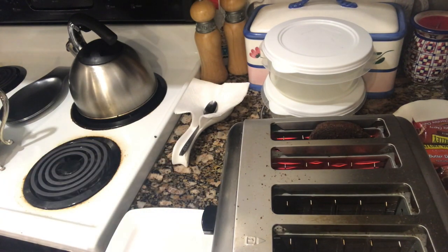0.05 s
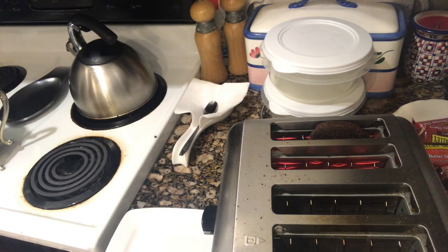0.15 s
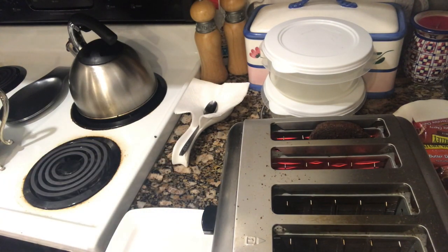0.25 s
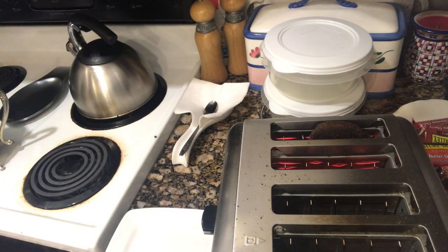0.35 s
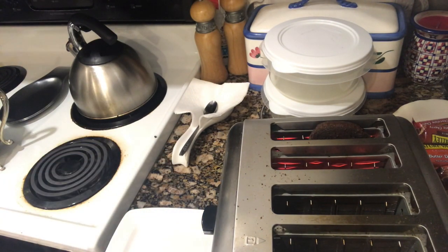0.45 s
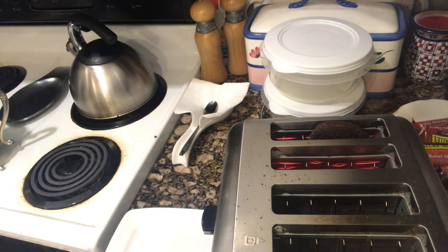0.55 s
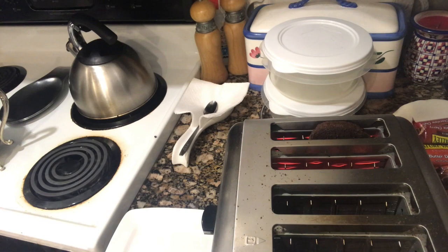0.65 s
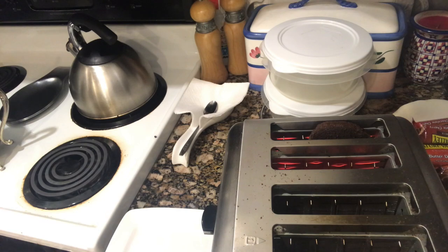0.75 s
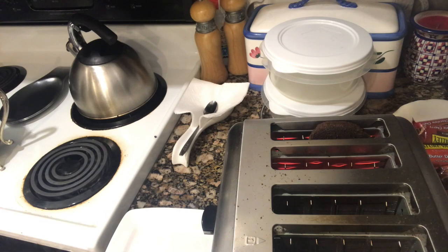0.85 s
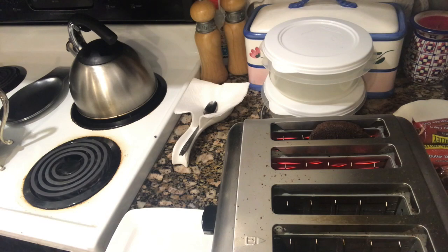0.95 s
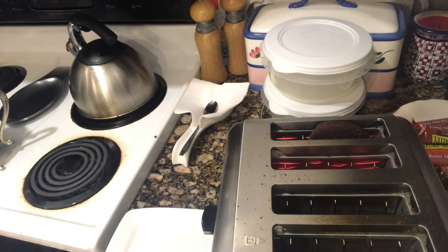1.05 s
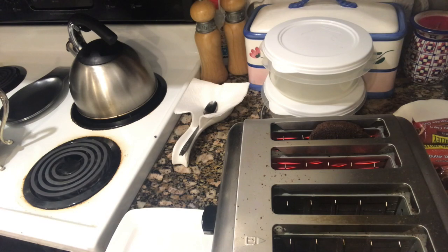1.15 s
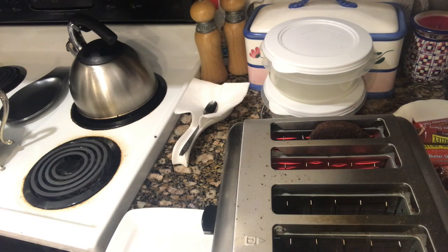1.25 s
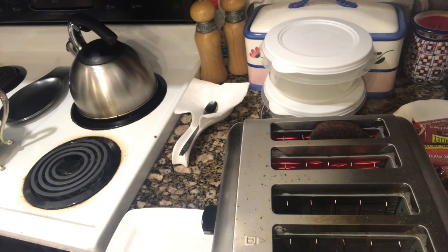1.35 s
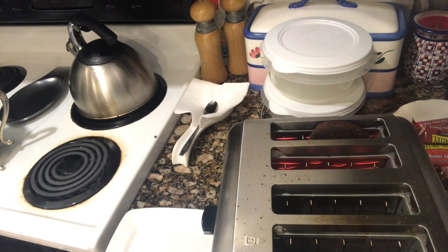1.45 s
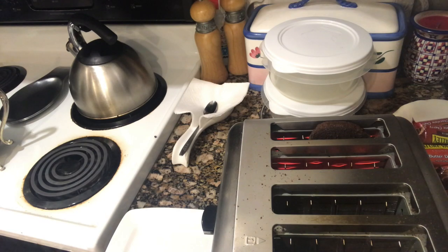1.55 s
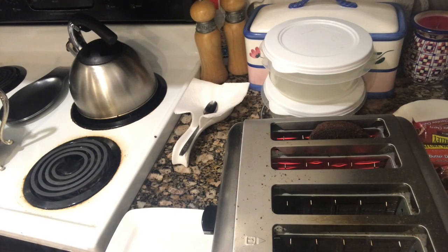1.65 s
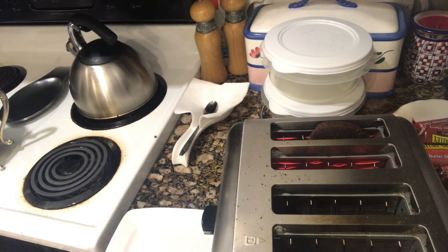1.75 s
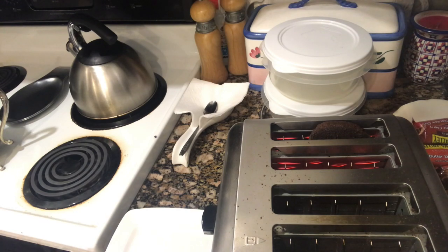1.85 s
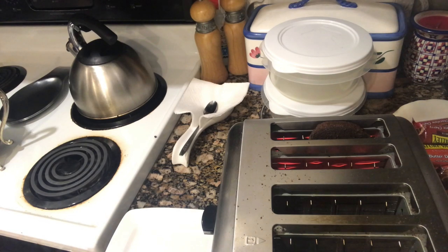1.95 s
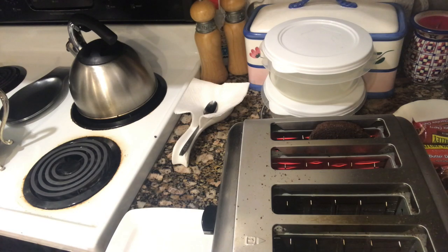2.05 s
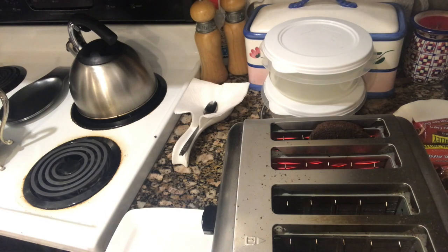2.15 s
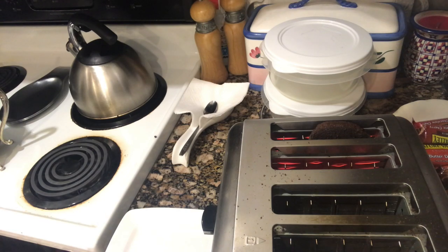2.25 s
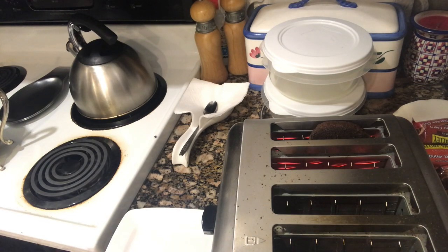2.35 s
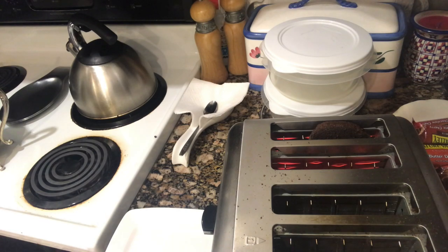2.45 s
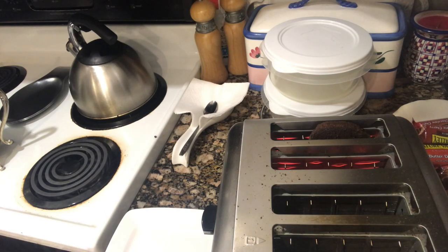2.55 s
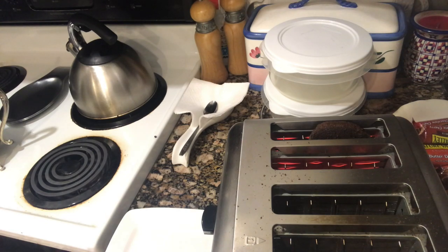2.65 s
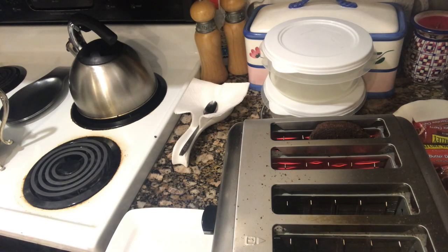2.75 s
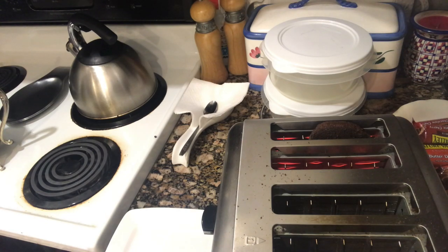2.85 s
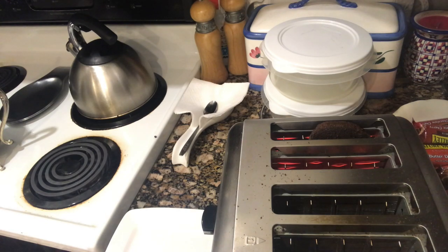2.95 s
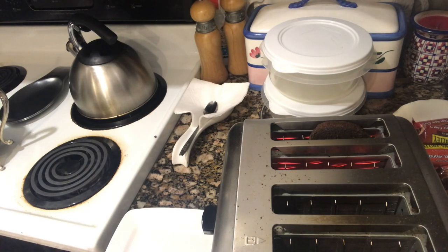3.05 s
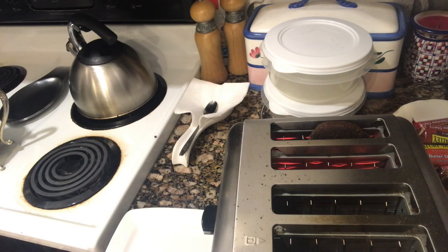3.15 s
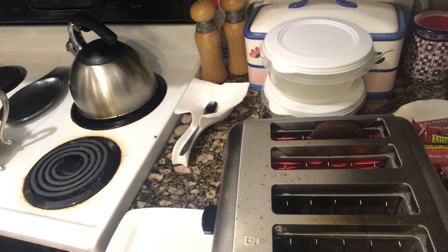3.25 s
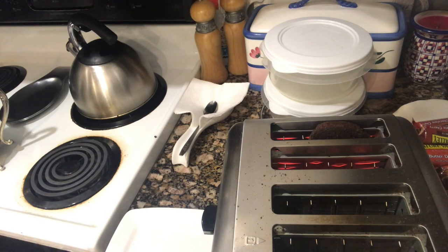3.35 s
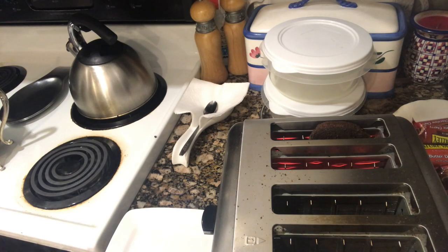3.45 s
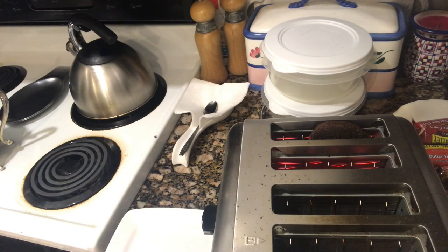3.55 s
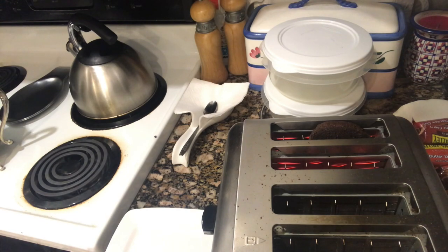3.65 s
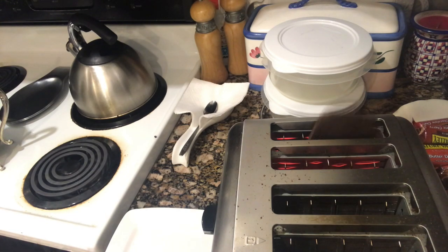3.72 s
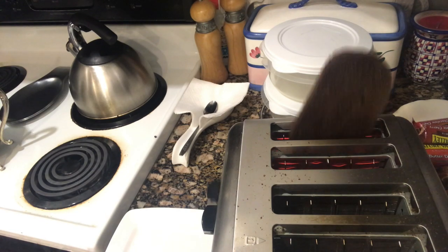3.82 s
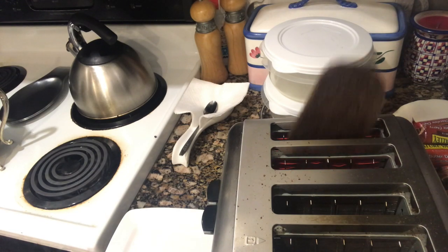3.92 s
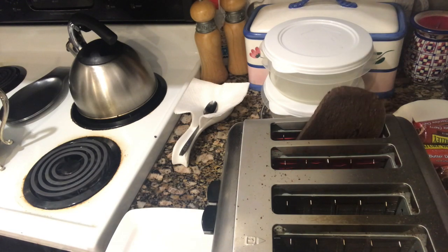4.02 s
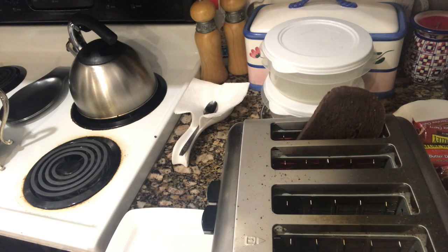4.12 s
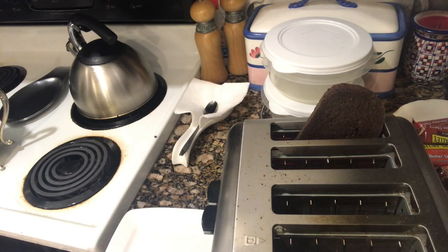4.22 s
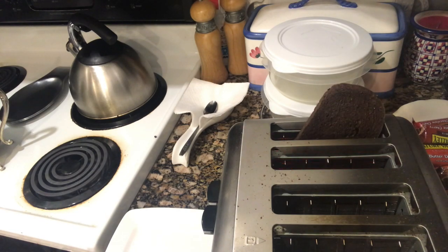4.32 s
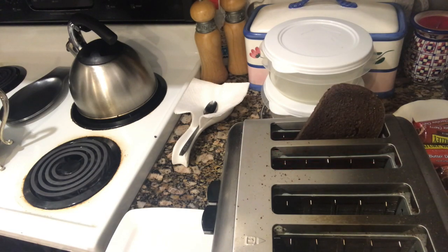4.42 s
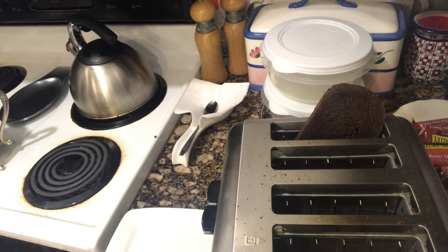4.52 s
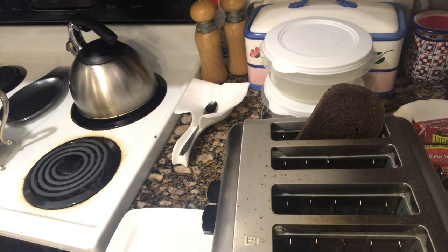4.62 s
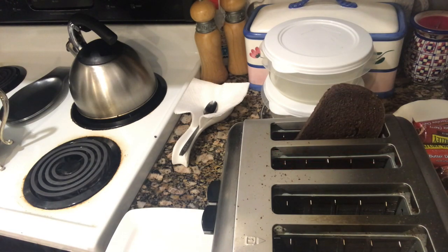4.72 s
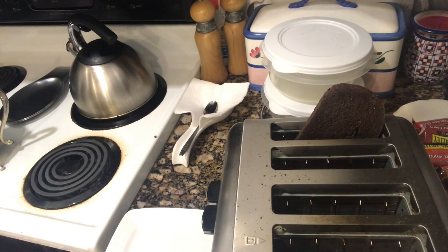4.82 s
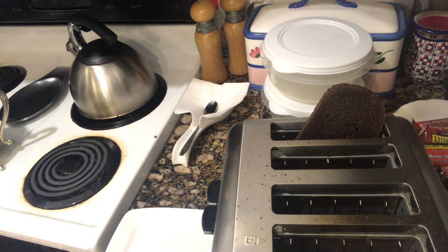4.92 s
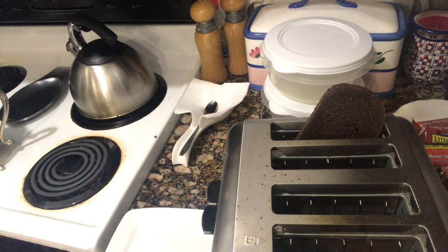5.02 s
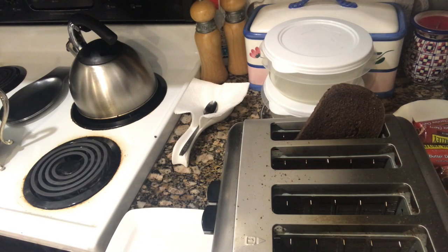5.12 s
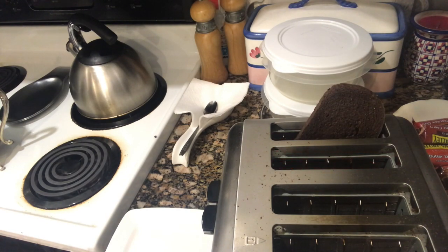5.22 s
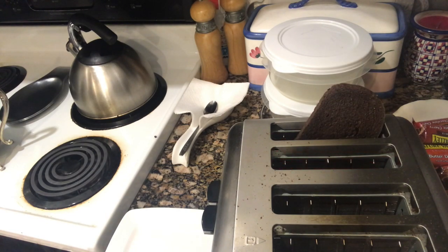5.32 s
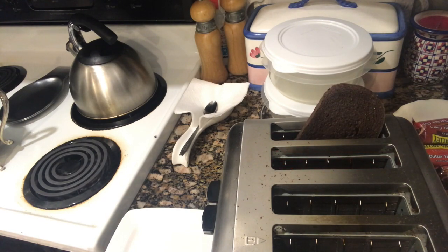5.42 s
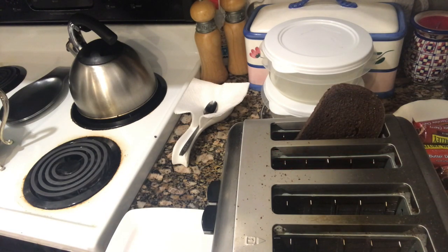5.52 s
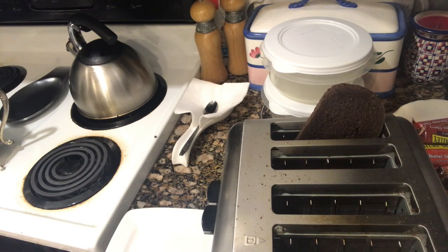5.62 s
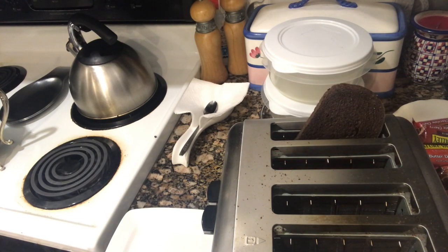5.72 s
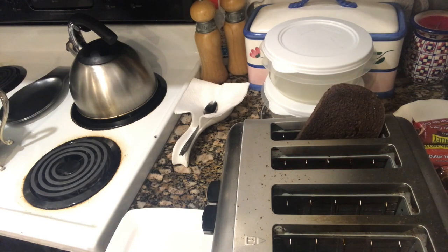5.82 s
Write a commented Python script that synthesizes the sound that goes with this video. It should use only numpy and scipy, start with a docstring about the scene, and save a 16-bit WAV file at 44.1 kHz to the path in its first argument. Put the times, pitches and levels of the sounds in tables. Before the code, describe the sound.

A quiet small kitchen with hard walls, heard through a hand-held microphone with faint low rumble and still room air. The first second is nearly silent: soft shuffling and tiny scrapes. At 1.1 s comes a dull hollow bump; around 1.5-1.7 s quick grainy scrapes and a thin, very high cutlery squeak; at 1.85 s a clear dish clink. A crockery clack follows at 2.5 s, a small hard click at 3.2 s, and dull wooden bumps at 3.5-3.7 s. At 3.79 s the close toaster catch trips and the sprung carriage slams up, a dense, bright steel clunk, by far the loudest event, chattering until 3.95 s with a low thump. The toast drops back with lighter rattles until 4.1 s, wire guards tick at 4.15-4.5 s, and low springs hum on, fading. Light scrapes, a hard click and dish knock at 4.8 s, and faint bumps and rustles close the scene.

```python
"""A steel toaster on a kitchen counter lets go: the catch trips, the sprung carriage slams up, chatters
against its stop and the toast drops back, leaving the springs humming. Each blow is grainy noise coloured
by the steel plus ringing modes; the hum is decaying sines. A little further off, kitchenware is knocked,
clinked and slid about, as noise bursts with modes or thin pings. The small hard room answers with a
diffuse tail; the hand-held microphone rumbles faintly."""
import sys
import numpy as np
from scipy import signal
from scipy.fft import rfft, irfft, next_fast_len
from scipy.io import wavfile
from scipy.ndimage import map_coordinates

SR = 44100
rng = np.random.default_rng(int(sys.argv[2]) if len(sys.argv) > 2 else 0)


def file_out(sig):
    """Save sig as 16-bit WAV at sys.argv[1]."""
    # one column per channel
    cols = np.atleast_2d(sig).T
    # limit, then scale
    lim = np.clip(cols, -1, 1)
    pcm = np.round(lim * 32767).astype(np.int16)
    wavfile.write(sys.argv[1], SR, pcm)


N = 259211
TIME = np.arange(N) / SR
AGE = TIME[:SR * 6 // 10]  # time since a contact began [s]
ONSET = SR // 40  # the opening 25 ms on which a contact's level is judged [samples]
STOP_S = 3.869  # the carriage hits its stop [s]


def amp(db):
    """Decibels to gain."""
    return 10 ** (np.asarray(db) / 20)


def unit(x, size=None):
    """Scale to rms 1, judged on the first size samples."""
    return x / np.sqrt(np.mean(x[:size] ** 2) + 1e-20)


def along(points, hz):
    """(Hz, value) points read on a log frequency axis."""
    f, v = np.transpose(points)
    return np.interp(np.log(hz + 1), np.log(f), v)


def fade(t, t60):
    """Exponential decay, 60 dB down after t60."""
    return np.exp(-np.log(1000) * t / t60)


def swell(s, rise, length, t60):
    """A gesture from time s: it rises, holds until length has passed, then decays."""
    return np.clip((TIME - s) / rise, 0, 1) * fade(np.maximum(TIME - s - length, 0), t60)


def add(track, s, sound):
    """Mix a sound into the track at time s."""
    room_left = track[round(s * SR):][:len(sound)]
    room_left += sound[:len(room_left)]


def noise(spectrum, size=N):
    """Coloured noise of rms 1."""
    m = next_fast_len(size)
    white = rfft(rng.standard_normal(m))
    gain = amp(along(spectrum, np.fft.rfftfreq(m, 1 / SR)))
    return unit(irfft(white * gain, m)[:size])


def wobble(rate):
    """A smooth random curve, rate knots a second."""
    knots = rng.standard_normal(int(N * rate / SR) + 4)
    return map_coordinates(knots, [TIME * rate / SR])


def rustle(flutter_db, drift_db):
    """Soft, uneven rubbing of rms 1."""
    # colour of soft rubbing: (frequency [Hz], relative level [dB])
    soft_colour = [(70, -25), (130, -9), (280, -2.5), (500, -4.5), (1100, -2), (2200, -14.5), (5500, -21),
                   (10000, -27.5), (15800, -36.5)]
    unevenness_db = flutter_db * wobble(70) + drift_db * wobble(14)
    return unit(noise(soft_colour) * amp(unevenness_db))


def grainy(grain_db):
    """White noise broken into tiny contacts of uneven strength."""
    contacts = np.repeat(rng.standard_normal(len(AGE)), 32)[:len(AGE)]  # each lasts 32 samples
    return rng.standard_normal(len(AGE)) * amp(grain_db * contacts)


def coloured(x, spectrum):
    """Pass x through a body with this spectrum: causal, so that its peaks ring on."""
    m = next_fast_len(2 * len(x))
    log_gain = np.log(amp(along(spectrum, np.fft.rfftfreq(m, 1 / SR))))
    # folding the cepstrum forward in time makes the filter minimum-phase
    cepstrum = irfft(log_gain, m)
    cepstrum[1:m // 2] *= 2
    cepstrum[m // 2 + 1:] = 0
    return irfft(rfft(x, m) * np.exp(rfft(cepstrum)), m)[:len(x)]


def tone(balance, db, colour_db):
    """Register levels of one contact: the object's own balance, leaning with how it is touched."""
    own_db, lean = np.transpose(balance)
    return db + own_db + lean * colour_db


def weigh(x, levels_db):
    """Where and how hard a contact lands sets the level of each register."""
    # thud, body, clash and fizz: (lower edge [Hz], upper edge [Hz])
    register_bands = [(100, 600), (600, 2000), (2000, 7000), (7000, 17000)]
    total = np.zeros(len(x))
    for k, (band, db) in enumerate(zip(register_bands, levels_db)):
        sos = signal.butter(3, band, 'bandpass', fs=SR, output='sos')
        part = unit(signal.sosfilt(sos, x), size=ONSET)
        total += (-1) ** k * amp(db) * part  # neighbours take opposite polarity
    return total


def ring(modes):
    """Modes rung at new strengths and phases by each blow."""
    hz, db, t60 = np.transpose(modes)[:, :, None]
    phase = rng.uniform(0, 2 * np.pi, hz.shape)
    level = amp(db + 3 * rng.standard_normal(hz.shape))
    capped = np.minimum(t60, AGE[-1])  # no mode rings longer than 0.6 s
    partials = level * fade(AGE, capped) * np.sin(2 * np.pi * hz * AGE + phase)
    return unit(np.sum(partials, axis=0), size=ONSET)


def blow(levels_db, chatter, spectrum, modes, t60, ring_db, grain_db):
    """Parts meet with a crack and chatter, then dense modes die fast and a few clear ones ring on."""
    crack = 1 + 0.42 * fade(AGE, 0.014)
    force = fade(np.maximum(AGE - chatter, 0), t60) * crack
    burst = coloured(grainy(grain_db) * force, spectrum)
    struck = unit(burst, size=ONSET) + amp(ring_db) * ring(modes)
    return weigh(struck * (1 - fade(AGE, .003)), levels_db)  # softened attack


def stroke(length, spectrum, grain_db):
    """Friction swells and eases off over one short slide."""
    pressure = np.sqrt(np.abs(np.sin(np.pi * np.minimum(AGE / length, 1))))
    return unit(coloured(grainy(grain_db) * pressure, spectrum), size=ONSET)


def boom(hz, t60, rise):
    """A single low mode that builds up and dies away."""
    return np.sin(2 * np.pi * hz * AGE) * fade(AGE, t60) * (1 - fade(AGE, rise))


def in_kitchen(x, wet_db):
    """The sound plus a diffuse tail that builds as the walls answer."""
    # decay of the small hard room: (frequency [Hz], t60 [s])
    room_decay = [(100, 0.54), (400, 0.32), (1200, 0.34), (4000, 0.3), (8000, 0.3), (15000, 0.25)]
    hz, t, z = signal.stft(rng.standard_normal(len(AGE)), SR, nperseg=256)
    decaying = z * fade(t, along(room_decay, hz)[:, None])
    tail = signal.istft(decaying, SR, nperseg=256)[1][:len(AGE)]
    tail = tail * (1 - fade(AGE, 0.026))
    answer = amp(wet_db) * tail / np.linalg.norm(tail)
    return x + signal.fftconvolve(x, answer)[:len(x)]


def room_air():
    """Still room air: steady coloured noise."""
    # colour of the quiet kitchen: (frequency [Hz], relative level [dB])
    air_colour = [(12, -26), (20, -7.5), (76, 1.5), (145, 0), (365, -9), (1110, -19), (1210, -26.5),
                  (1470, -19.5), (2880, -21.5), (3130, -18.5), (4890, -26.5), (5780, -20.5), (6840, -26),
                  (12000, -30.5), (15800, -30)]
    return amp(-70.5) * noise(air_colour)


def microphone_rumble():
    """A faint rumble from the hand-held microphone rises as the hand shifts or the toaster jolts it."""
    # rumble swells: (time [s], rumble level [dB], length [s])
    rumble_swells = [(0.102, -59.5, 0.14), (0.79, -54.5, 0.11), (1.292, -58, .12), (1.59, -61, .09),
                     (1.79, -63, 0.14), (2.043, -66.5, 0.36), (2.505, -64, 0.085), (3.216, -66.5, 0.092),
                     (3.47, -65.5, 0.046), (3.777, -55.5, .08), (4.043, -56.5, 0.078), (4.664, -57, 0.14),
                     (5.243, -58, 0.094)]
    # colour of the rumble: (frequency [Hz], relative level [dB])
    rumble_colour = [(12, -29.5), (20, -10), (43, 3.5), (75, -7), (113, -3.5), (194, -39.5), (250, -11.5),
                     (320, -33), (550, -120)]
    power = amp(-77) ** 2  # steady holding
    for s, db, length in rumble_swells:
        power = power + (amp(db) * swell(s, rise=0.059, length=length, t60=.8)) ** 2
    return np.sqrt(power) * noise(rumble_colour)


def shuffling():
    """Soft shuffling at the counter, uneven rubbing that comes and goes."""
    # the shuffling as it comes and goes: (time [s], level [dB])
    bustle = [(0, -67.5), (.55, -85.5), (1.0, -77.5), (1.7, -61.5), (2.8, -75), (3.4, -71), (4.55, -67),
              (5.1, -76.5), (5.88, -73.5)]
    bustle_db = np.interp(TIME, *np.transpose(bustle))
    return in_kitchen(amp(bustle_db) * rustle(flutter_db=3, drift_db=2.5), wet_db=-12.0)


def sliding():
    """Things dragged over the counter give short grainy scrapes."""
    # slides and rustles: (time [s], relative level [dB], brightness [dB], stroke length [s])
    strokes = [(0.729, -71.5, 10, 0.048), (0.804, -58.5, 3.5, 0.069), (0.901, -62.5, 5, .043),
               (1.002, -63, -11, 0.026), (1.344, -65, -7, 0.036), (1.526, -57.5, 11.5, 0.025),
               (1.555, -52.5, 1, 0.037), (1.645, -48.5, 2.5, 0.033), (1.691, -57.5, -8.5, 0.063),
               (2.124, -73, -12, 0.059), (2.327, -65.5, 7.5, .075), (2.73, -69, -7.5, 0.052),
               (2.931, -71.5, -3, 0.022), (3.186, -76.5, -17, 0.037), (4.47, -69.5, -1, 0.048),
               (4.553, -60, 4, 0.012), (4.597, -78.5, -12, 0.13), (5.252, -73, 2, .1),
               (5.377, -62, 1.5, 0.035), (5.443, -73.5, -1, 0.024), (5.805, -59.5, 12, 0.035)]
    # colour of a scrape: (frequency [Hz], relative level [dB])
    scrape_colour = [(88, -41), (150, -46), (249, 0.5), (375, -6), (786, -3), (2080, -9.5), (4040, -9),
                     (5000, -15.5), (8980, -13), (10300, -19), (14100, -14.5), (15800, -20)]
    # thud, body, clash, fizz: (share [dB], gain per brightness [dB/dB])
    scrape_balance = [(-5.5, -0.42), (1, -0.52), (-1, 0.58), (-12.5, 0.42)]
    out = np.zeros(N)
    for s, db, bright_db, length in strokes:
        levels_db = tone(scrape_balance, db, bright_db)
        scrape = weigh(stroke(length, scrape_colour, grain_db=1.0), levels_db)
        add(out, s, amp(-3.5) * in_kitchen(scrape, wet_db=-0.5))
    return out


def cutlery_squeaks():
    """Thin steel dragged over a hard surface squeaks very high: friction noise and faint ringing."""
    # squeaks: (time [s], level [dB], stroke length [s])
    squeaks = [(1.644, -38.5, 0.033), (1.694, -47.5, 0.026), (1.842, -58.5, 0.085), (2.163, -60, 0.016),
               (4.534, -62, 0.073)]
    # colour of the friction: (frequency [Hz], relative level [dB])
    squeal_colour = [(8000, -33), (10200, -11.5), (10750, 4.5), (11600, -7), (12500, -10), (14300, -5.5),
                     (15300, 4.5), (15800, 0)]
    # ringing tines: (frequency [Hz], relative level [dB], t60 before the cap [s])
    tine_modes = [(10980, -29, .3), (11030, -20, 0.097), (11360, -33, .2), (14000, -12.5, 0.83),
                  (14250, -10.5, 0.45), (15160, 3, 0.2), (15600, 8, .27), (15200, 13, .25),
                  (15500, -8, 0.48)]
    out = np.zeros(N)
    for s, db, length in squeaks:
        rub = stroke(length, squeal_colour, grain_db=1.0)
        tines = ring(tine_modes) * (1 - fade(AGE, 0.045))
        add(out, s, amp(db) * in_kitchen(rub + amp(-23.0) * tines, wet_db=-4))
    return out


def cutlery_pings():
    """Thin steel, touched, pings: a few decaying partials that waver in phase."""
    # pings: (time [s], level of each partial [dB], t60 [s], partials [Hz])
    pings = [(1.306, -63, 0.16, [3110, 4160, 5250, 6330, 15900]), (1.529, -62, 0.3, [9800, 6500, 13000]),
             (1.783, -64, .3, [11000, 12550, 13550]), (1.842, -56, .25, [13950]),
             (2.335, -64, 0.19, [5700]), (4.478, -73, 0.14, [6900, 11000]),
             (4.555, -64, .33, [1120, 4330, 4600, 14300])]
    out = np.zeros(N)
    for s, db, t60, partials_hz in pings:
        # the moving contact makes each partial waver
        steps = rng.standard_normal((len(partials_hz), len(AGE)))
        drift = .1 * np.cumsum(steps, axis=1)
        partials = np.sin(2 * np.pi * np.outer(partials_hz, AGE) + drift)
        ping = partials.sum(axis=0) * fade(AGE, t60) * (1 - fade(AGE, 0.0031))
        add(out, s, amp(db) * in_kitchen(ping, wet_db=0))
    return out


def woodwork():
    """Dull bumps on cupboard and counter: larger panels sound lower; a few low booms swell beside them."""
    # bumps: (time [s], relative level [dB], hollowness [dB], pitch ratio)
    bumps = [(.208, -68, -4, 0.98), (1.081, -47.5, 10, 0.91), (1.481, -56, 1, 0.87),
             (3.054, -64.5, -2.5, 0.64), (3.484, -55.5, 2, 0.83), (3.506, -53, 1.5, 1),
             (3.528, -56.5, -2.5, 0.3), (3.691, -62, -5.5, 0.98), (3.712, -51.5, -2.5, 0.99),
             (4.743, -61, 10.5, 0.52), (5.347, -62, 7, 0.61), (5.55, -60.5, 2, 0.73)]
    # colour of a panel at pitch ratio 1: (frequency [Hz], relative level [dB])
    wood_colour = [(71, -62.5), (120, -18.5), (181, -20), (377, -10.5), (443, -13.5), (491, -10),
                   (739, -7.5), (1510, -8.5), (2510, -25.5), (2840, -25), (5140, -29), (8920, -41),
                   (9680, -49), (15800, -48)]
    # thud, body, clash, fizz: (share [dB], gain per hollowness [dB/dB])
    wood_balance = [(2, -0.73), (-1, .55), (-3, -.5), (-15.5, -0.46)]
    # low booms: (time [s], frequency [Hz], level [dB])
    booms = [(3.056, 244.6, -44.5), (3.18, 266, -57), (3.501, 299, -52), (3.706, 304.5, -46),
             (5.55, 282, -58)]
    out = np.zeros(N)
    for s, db, hollow_db, pitch in bumps:
        panel = np.array(wood_colour) * [pitch, 1]
        thump = coloured(grainy(grain_db=5.5) * fade(AGE, 0.06), panel)
        bump = weigh(thump, tone(wood_balance, db, hollow_db))
        add(out, s, amp(-3.0) * in_kitchen(bump, wet_db=0.5))
    for s, hz, db in booms:
        add(out, s, amp(db) * boom(hz, t60=.19, rise=.09))
    return out


def trinket():
    """A small hard thing clicks on the counter and rings, with plenty of room behind."""
    # clicks: (time [s], relative level [dB], brightness [dB], contact length [s])
    clicks = [(1.386, -61, 4, 0.0082), (3.232, -46.5, 1.5, .006), (3.433, -62, 4.5, 0.0076),
              (4.834, -46, 2.5, 0.0054)]
    # colour: (frequency [Hz], relative level [dB])
    trinket_colour = [(71, -38.5), (120, -12.5), (462, -15), (627, -4.5), (709, -23.5), (1000, 0),
                      (1210, -10), (1360, -5.5), (1710, -12), (4020, -3), (4550, -10.5), (6840, -15.5),
                      (15800, -42)]
    # ringing: (frequency [Hz], relative level [dB], t60 [s])
    trinket_modes = [(2620, -11, 0.37), (3340, -2.5, 0.24), (4048, 0.5, 0.21), (6280, -8, 0.22),
                     (6800, -17, 0.42), (7610, -6, 0.22)]
    # thud, body, clash, fizz: (share [dB], gain per brightness [dB/dB])
    trinket_balance = [(-9.5, -0.3), (-8.5, 1.7), (0, 0.3), (-19.5, 3)]
    out = np.zeros(N)
    for s, db, bright_db, contact in clicks:
        levels_db = tone(trinket_balance, db, bright_db)
        click = blow(levels_db, contact, trinket_colour, trinket_modes, t60=.03, ring_db=-13, grain_db=3.0)
        add(out, s, amp(-6.5) * in_kitchen(click, wet_db=0.5))
    return out


def crockery():
    """Heavier crockery set down: a clack that rings it, with some room behind."""
    # clacks: (time [s], relative level [dB], brightness [dB], contact length [s])
    clacks = [(.99, -62.5, -3, .003), (2.036, -58, -7.5, 0.0052), (2.32, -58.5, -6.5, 0.012),
              (2.495, -41.5, 0.5, 0.01)]
    # colour: (frequency [Hz], relative level [dB])
    crock_colour = [(71, -49), (120, -20.5), (301, -13), (501, -14), (1050, 0), (1510, -11.5),
                    (1710, -13.5), (2670, -17.5), (3780, -12.5), (5140, -22), (5930, -15.5), (7130, -25),
                    (15800, -46)]
    # ringing: (frequency [Hz], relative level [dB], t60 [s])
    crock_modes = [(870, 3, 0.16), (1073, 8, 0.22), (2940, 7, 0.097), (3800, 3, 0.16), (4400, -19, 0.33),
                   (5800, -27, 0.22), (6840, -31, 0.4), (7757, -8, 0.16)]
    # thud, body, clash, fizz: (share [dB], gain per brightness [dB/dB])
    crock_balance = [(-6.5, -1.6), (1.5, -0.2), (-0.5, 0.76), (-14.5, 0.23)]
    out = np.zeros(N)
    for s, db, bright_db, contact in clacks:
        levels_db = tone(crock_balance, db, bright_db)
        clack = blow(levels_db, contact, crock_colour, crock_modes, t60=0.024, ring_db=-11.5, grain_db=3.5)
        add(out, s, amp(-4.5) * in_kitchen(clack, wet_db=-1.0))
    return out


def dish():
    """A dish is clinked: a short knock that rings it, with some room behind."""
    # knocks: (time [s], relative level [dB], brightness [dB], contact length [s], relative ring [dB])
    knocks = [(0.034, -63.5, -7.5, 0.009, -24), (1.85, -40, -2, 0.0057, -2),
              (1.86, -43.5, -10.5, 0.002, -5), (4.796, -54.5, -4.5, .003, -6)]
    # colour: (frequency [Hz], relative level [dB])
    dish_colour = [(120, -17), (420, -18), (620, -11), (1050, -3), (1450, -8), (2100, -16), (2900, -12),
                   (4000, -12), (5000, -16), (6100, -12), (7600, -21), (10000, -29), (15800, -31)]
    # ringing: (frequency [Hz], relative level [dB], t60 [s])
    dish_modes = [(923, -10, .22), (1027, 7, 0.23), (1114, 9, 0.17), (1350, -3, 0.32), (2100, -3, .14),
                  (2860, -4, .18), (3310, -10, 0.18), (3840, -20, 0.18), (5652, -22, .12),
                  (6600, -29, 0.16), (6907, -11.5, 0.23), (7580, -11, 0.17), (7833, -16, .25)]
    # thud, body, clash, fizz: (share [dB], gain per brightness [dB/dB])
    dish_balance = [(-12, -0.24), (-1, -0.5), (3.5, .7), (-4.5, 0.5)]
    out = np.zeros(N)
    for s, db, bright_db, contact, ring_db in knocks:
        levels_db = tone(dish_balance, db, bright_db)
        knock = blow(levels_db, contact, dish_colour, dish_modes, t60=0.083, ring_db=ring_db, grain_db=1.0)
        add(out, s, amp(-4.5) * in_kitchen(knock, wet_db=-4.0))
    return out


def toaster_feet():
    """The toaster's feet thump the counter: low decaying sines."""
    # thumps: (time [s], frequency [Hz], level [dB], t60 [s])
    thumps = [(3.804, 139, -40.5, 0.33), (3.868, 76.7, -47.5, 0.32), (3.867, 156, -40, 0.28)]
    out = np.zeros(N)
    for s, hz, db, t60 in thumps:
        add(out, s, amp(db) * boom(hz, t60, rise=0.028))
    return out


def toaster_springs():
    """Shaken at the stop, the frame booms briefly and the slack springs hum on as decaying sines."""
    # springs and frame: (frequency [Hz], level [dB], t60 [s])
    spring_modes = [(86.5, -56, 4.5), (126, -61, 3.5), (213.5, -54, 3), (240, -50, .9), (255, -44, .85),
                    (266, -54, 1.3), (328, -56, 1.6), (420, -39, .65), (432, -55, 1.5)]
    hum = np.zeros(N)
    for hz, db, t60 in spring_modes:
        hum += amp(db) * fade(TIME, t60) * np.sin(2 * np.pi * hz * TIME)
    out = np.zeros(N)
    add(out, STOP_S, hum * (1 - fade(TIME, .05)))
    return out


def toaster_shiver():
    """The shaken carriage and toast go on shivering after the slam: soft rubbing that dies away."""
    envelope = swell(STOP_S, rise=.012, length=0.3, t60=0.48)
    return amp(-55.5) * envelope * rustle(flutter_db=3, drift_db=1)


def toaster_guards():
    """The toast jiggles the wire guards: light blows with a short wiry ring."""
    # jiggles: (time [s], relative level [dB], brightness [dB], chatter length [s])
    jiggles = [(4.145, -48, 0, 0.0032), (4.162, -47, 1, 0.011), (4.312, -52.5, -0.5, 0.011),
               (4.347, -66, 2.5, .005), (4.426, -60.5, -5.5, 0.0037), (4.478, -62.5, -1.5, .008)]
    # colour: (frequency [Hz], relative level [dB])
    wire_colour = [(150, -10.5), (1200, -12), (1600, -3), (2200, -16), (2680, 1), (3300, -13.5),
                   (5000, -14), (5950, -9), (7000, -18), (10200, -18), (15800, -22.5)]
    # ringing: (frequency [Hz], relative level [dB], t60 [s])
    guard_modes = [(1620, -6, .08), (2620, -2, .08), (2740, -2, .09), (5780, -2, .07), (5920, -2, .08),
                   (6080, -1, .08), (8100, -9, .07), (10200, -9, .07)]
    # thud, body, clash, fizz: (share [dB], gain per brightness [dB/dB])
    wire_balance = [(-7, -0.07), (-8.5, -0.86), (0.5, 0.13), (-3, 1.4)]
    out = np.zeros(N)
    for s, db, bright_db, chatter in jiggles:
        levels_db = tone(wire_balance, db, bright_db)
        jiggle = blow(levels_db, chatter, wire_colour, guard_modes, t60=0.035, ring_db=-9.5, grain_db=2.5)
        add(out, s, amp(-7.0) * in_kitchen(jiggle, wet_db=-5))
    return out


def toaster_carriage():
    """The catch trips, the carriage slams and rattles the steel shell, and the toast drops back."""
    # blows of carriage, then toast: (time [s], relative level [dB], brightness [dB], chatter length [s])
    carriage_blows = [(3.786, -47, -6.5, 0.004), (3.789, -32, -2.5, 0.022), (3.804, -23, 2, .01),
                      (3.808, -29, -0.5, .008), (3.862, -29.5, -5.5, .006), (3.866, -29, 3.5, 0.0082),
                      (3.875, -24.5, -7, 0.0066), (3.891, -27.5, 1.5, 0.014), (3.924, -29.5, 4, .004),
                      (3.944, -32, 5.5, 0.004), (3.95, -30.5, -3, 0.0049), (4.019, -52.5, -13, .006),
                      (4.037, -42, -4, 0.0092), (4.064, -44.5, 4, .02), (4.085, -41.5, -2, 0.0095)]
    # colour: (frequency [Hz], relative level [dB])
    steel_colour = [(70, -24), (140, -4.5), (195, -26), (255, 12), (340, -21), (420, -2), (540, -6),
                    (900, -4), (1240, -3.5), (1550, 1.5), (2000, -4.5), (4500, -9.5), (5900, -6),
                    (7600, -14.5), (15800, -15)]
    # ringing: (frequency [Hz], relative level [dB], t60 [s])
    shell_modes = [(721, -5, .4), (881, -4, .4), (992, -3, .4), (1162, -4, .35), (1261, -4, .35),
                   (1380, 0, .3), (1502, 1, .3), (1672, 0, .3), (2058, -3, .35), (2217, -6, .35),
                   (2488, -4, .35), (2615, -3, .35), (2756, -4, .35), (2944, -1, .35), (3230, -3, .3),
                   (3727, -4, .35), (4016, -5, .35), (4546, -5, .35), (5136, -4, .3), (5641, -1, .3),
                   (6079, -1, .3), (6659, -5, .3), (7445, -8, .3), (9954, -9, .3), (13095, -6, .3)]
    # thud, body, clash, fizz: (share [dB], gain per brightness [dB/dB])
    steel_balance = [(-10, -0.26), (-2.5, -0.2), (-0.5, 0.35), (-5, 1.77)]
    out = np.zeros(N)
    for s, db, bright_db, chatter in carriage_blows:
        levels_db = tone(steel_balance, db, bright_db)
        clash = blow(levels_db, chatter, steel_colour, shell_modes, t60=0.065, ring_db=-15, grain_db=0.0)
        add(out, s, amp(-6.5) * in_kitchen(clash, wet_db=-6.0))
    return out


def scene():
    """Everything at one microphone."""
    background = room_air() + microphone_rumble() + shuffling()
    counter = sliding() + cutlery_squeaks() + cutlery_pings() + woodwork()
    kitchenware = trinket() + crockery() + dish()
    toaster = toaster_feet() + toaster_springs() + toaster_shiver() + toaster_guards() + toaster_carriage()
    return (background + counter + kitchenware + toaster)[None]


def record(dry):
    """The recorder keeps nothing above its band limit."""
    m = next_fast_len(N + SR // 4)
    kept = np.fft.rfftfreq(m, 1 / SR) < 15850  # band limit [Hz]
    return irfft(rfft(dry, m) * kept, m)[..., :N]


dry = scene()
out = record(dry)
file_out(out)
```